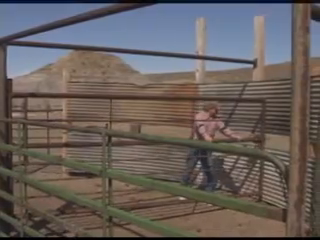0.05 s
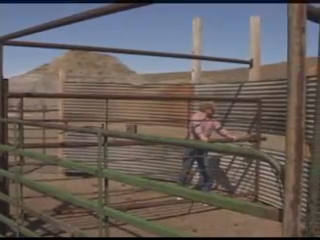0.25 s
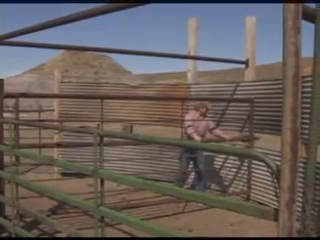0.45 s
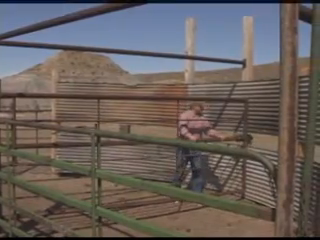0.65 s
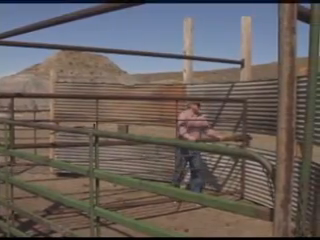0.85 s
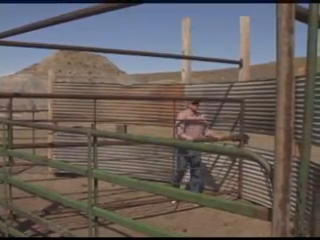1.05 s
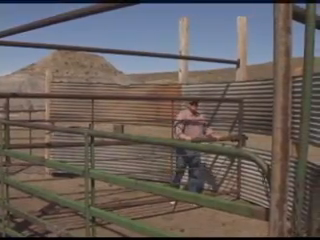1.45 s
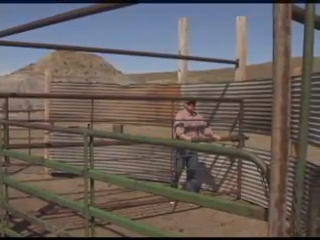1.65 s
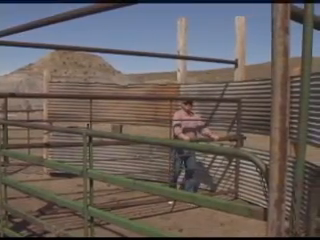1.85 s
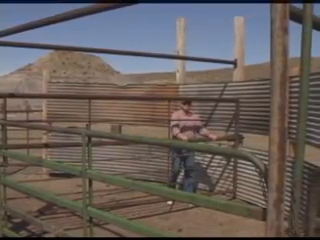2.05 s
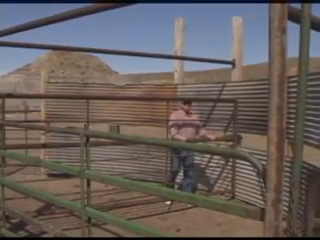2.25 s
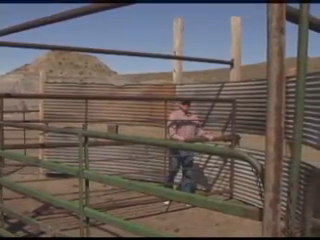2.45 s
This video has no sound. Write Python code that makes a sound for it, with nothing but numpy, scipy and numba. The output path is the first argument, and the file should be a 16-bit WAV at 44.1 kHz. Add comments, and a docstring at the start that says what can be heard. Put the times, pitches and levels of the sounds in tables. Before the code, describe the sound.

Metal pipe gate bangs shut with a jangle, followed by three duller clanks and rattling.

```python
"""A steel pipe gate bangs in an open corral walled with corrugated sheet, in light wind.
One bright jangling crash, flattened by a limiter, sets the pipes ringing; three duller
knocks follow, clanking the latch post and shaking the sheet wall. Between them the gate
shudders and rattles on its fittings, and the sliding latch scrapes and squeaks."""
import sys
import numpy as np
from scipy import signal
from scipy.fft import rfft, irfft
from scipy.io import wavfile
from scipy.ndimage import uniform_filter1d
from numba import njit

SR = 44100
rng = np.random.default_rng(int(sys.argv[2]) if len(sys.argv) > 2 else 0)


def int16_out(signal):
    """Quantize to a 16-bit WAV file."""
    q = np.round(np.clip(np.atleast_2d(signal).T, -1, 1) * 32767)
    wavfile.write(sys.argv[1], SR, q.astype(np.int16))


N = 114660

# EQ curves of the noise layers. Each row: frequency in Hz, relative level in dB.
WIND_EQ = [(15, -14.5), (30, 2), (60, 0), (110, -6.5), (200, -13), (400, -26), (1000, -45.5)]
AIR_EQ = [(100, -15.5), (300, -0.5), (550, -2), (900, 1), (1500, -7), (2600, -12), (4800, -20.5),
          (7500, -58), (9000, -74)]
CRASH_EQ = [(160, -44), (300, -23.5), (480, -5), (750, -3.5), (1150, -1.5), (2100, -4), (3000, -4.5),
            (4400, -3), (6000, -11.5), (7900, -6.5), (9000, -32.5)]
CLATTER_EQ = [(150, -12), (350, -17), (600, 8.5), (900, 12.5), (1500, 6.5), (2600, 3), (6000, -26.5),
              (9000, -77)]
CRACK_EQ = [(200, -35), (600, -31), (1200, -6.5), (3200, 3), (5000, 0), (7600, -2.5), (9200, -45)]
DULL_STEEL_EQ = [(120, -7.5), (250, -8), (500, -1), (850, 5.5), (1250, 1.5), (1800, -3.5), (3000, -11),
                 (9000, -32)]
BRIGHT_STEEL_EQ = [(1000, 1), (2200, -2), (3200, -4.5), (4300, 4.5), (5600, -6.5), (7800, -12.5),
                   (8800, -21.5)]
RATTLE_EQ = [(300, 2), (850, -4.5), (1150, 7.5), (1500, -3), (1850, 2.5), (2200, 5), (2700, -12),
             (5500, -10), (9000, -36)]
# Stereo width. Each row: frequency in Hz, side minus mid in dB.
WIDTH = [(60, -16.5), (300, -31), (600, -68), (1200, -22.5), (2500, -5.5), (4500, -2), (8000, 5)]

# Resonances of frame, pipes, damped latch post and sheet wall.
# Each row: pitch in Hz, relative level in dB, seconds to fall 60 dB (t60).
FRAME_MODES = [(408, -1, 0.22), (458, -1.5, 0.25), (840, -8, 0.17)]
PIPE_MODES = [(410, -38, 1.7), (450, -36, 1.7), (593, -29.5, 2.0), (715, -28, 2.0), (736, -29, 1.2),
              (994, -29, 1.6), (1107, -20, .8), (1280, -27, 1.2), (1463, -24, 1.0), (1907, -26, .8),
              (1945, -25, .85), (2029, -25, .7), (2654, -28, .7), (4210, -31, .7), (5880, -28, .45),
              (7214, -29, .45), (7790, -31, .45)]
POST_MODES = [(546.4, -14, 0.071), (820, -9.5, 0.073), (909, -7.5, 0.086), (1127, -10, 0.043),
              (1340, -25.5, .025), (1530, -21.5, 0.075), (2920, -23.5, 0.0047)]
WALL_MODES = [(74, -9, 3.6), (101.4, -0.5, 0.74), (128.8, -4, 1.02)]
# Tones of the fittings. Each row: pitch in Hz, relative level in dB.
FITTING_MODES = [(803, -10), (1085, -10.5), (1776.5, -6.5), (1958, -21.5), (2180, -12)]
# Tail of the crash. Each row: band centre in Hz, t60 in seconds.
CRASH_TAILS = [(300, 1.64), (800, 1.13), (1400, 0.95), (2400, 0.78), (4500, 0.52), (8000, 0.17)]

# Puffs of wind. Each row: peak time in seconds, half length in seconds, boost in dB.
GUSTS = [(0.628, 0.042, 3.5), (2.036, 0.041, 8)]
# Latch scrapes. Each row: start in seconds, hold in seconds, level in dB.
SCRAPES = [(0., .03, -33.5), (0.038, 0.07, -41), (0.873, 0.076, -33.5), (1.072, 0.1, -37.5),
           (1.408, 0.022, -43), (1.607, 0.042, -39.5), (1.77, 0.031, -41.5), (2.45, 0.099, -41)]
# Latch squeaks. Each row: start in seconds, hold in seconds, pitch in Hz, level in dB.
SQUEAKS = [(0.725, 0.087, 4150, -34), (0.89, .095, 4090, -36.5), (1.77, .012, 3750, -35)]
# Gate hits, the first layered with the crash. Each row: start in seconds, levels in dB of clank, crack,
# dull wash, bright wash and wall boom, clank tilt in dB per octave, clank pitch ratio.
BLOWS = [(0.2305, -1, -11.5, -37, -25, -56.5, -2, 1.46), (0.7085, -4.5, -13.5, -21, -25.5, -28, 11, 1.0),
         (1.1508, -7, -30, -30, -34, -36, -11, .96), (2.0722, -0.5, -20.5, -23, -31.5, -27, 2.5, 1.0)]
# Contacts within one hit. Each row: delay in seconds, relative level in dB.
BOUNCES = [(0, -1), (.0036, -10.5), (.0088, -12.5)]
# Swings of the shuddering gate. Each row: start in seconds, level in dB.
RATTLES = [(1.021, -29), (1.095, -29.5), (1.205, -30), (1.277, -30.5), (1.39, -33), (1.435, -43),
           (1.524, -32.5), (1.616, -31.5), (1.688, -38.5), (1.786, -34), (1.864, -40.5), (1.947, -41),
           (2.311, -37), (2.528, -32.5)]

WIND_DB, AIR_DB, HUM_DB, CRASH_DB, PIPE_DB = -36.5, -37, -30, -7.5, 2.5
CRASH_START_S, CRASH_RISE_S, JANGLE_HOLD_S = 0.225, 0.018, 0.011
CLANK_LOW_CUT_HZ, TILT_PIVOT_HZ = 380, 900
BEND_DELAY_S = 0.00078  # travel time of a 1 kHz bending wave along the pipe
LIMIT_DB, LIMIT_ATTACK_S, LIMIT_RELEASE_S = -5, 0.0017, 0.029
CLIP_LEVEL, HIGH_CUT_HZ = 1.15, 8650


def undb(db):
    """Decibels to gain."""
    return 10 ** (np.asarray(db) / 20)


def pan(db):
    """Channel gains for a left-minus-right level."""
    return undb(np.array([[db], [-db]]) / 2)


def lookup(table, hz):
    """Read (Hz, value) points on a log-frequency axis."""
    freqs, values = np.array(table, float).T
    return np.interp(np.log(np.maximum(hz, 1)), np.log(freqs), values)


def since(start):
    """Seconds since the start, zero before it."""
    return np.maximum(np.arange(N) / SR - start, 0)


def envelope(start, rise, hold, t60):
    """Linear attack, hold, exponential release, all in seconds."""
    attack = np.minimum(since(start) / max(rise, 1 / SR), 1)
    return attack * np.exp(-np.log(1000) * since(start + rise + hold) / t60)


def widen(mid, side, hz):
    """Stereo image: tight in the bass, wide in the treble."""
    width = undb(lookup(WIDTH, hz))
    return (mid + np.array([[1], [-1]]) * width * side) / np.sqrt(1 + width ** 2)


def noise(eq, spacing_hz=0, side_db=0):
    """EQ'd stereo noise, rms 1; with a mean spacing, a crowd of irregular partials instead."""
    hz = np.fft.rfftfreq(N, 1 / SR)
    mid, side = rfft(rng.standard_normal((2, N)))
    gain = undb(lookup(eq, hz))
    if spacing_hz:
        gain = gain * (rng.random(len(hz)) < hz[1] / spacing_hz)
        mid, side = mid / abs(mid), side / abs(side)
    y = irfft(widen(mid, undb(side_db) * side, hz) * gain, N)
    return y / y.std()


def drift(rate_hz):
    """Smooth random modulation, spread 1."""
    span = int(SR / rate_hz)
    y = uniform_filter1d(rng.standard_normal(N), span, mode="wrap")
    y = uniform_filter1d(y, span, mode="wrap")
    return y / y.std()


def tone(hz, waver=0):
    """One stereo partial, rms 1, with an optional relative pitch waver."""
    phase = 2 * np.pi * np.cumsum(hz * (np.ones(N) + waver)) / SR + rng.uniform(0, 2 * np.pi)
    return np.sqrt(2) * widen(np.sin(phase), rng.choice([-1, 1]) * np.cos(phase), hz)


def ring(modes, start, rise):
    """Struck modes that swell and die away."""
    return sum(undb(db) * tone(hz) * envelope(start, rise, 0, t60) for hz, db, t60 in modes)


def wind_and_air():
    """The bed: low wind on the microphone, with two puffs, over the steady air of the yard."""
    puffs_db = sum(db * np.exp(-((since(0) - peak) / half) ** 2) for peak, half, db in GUSTS)
    wind = noise(WIND_EQ, side_db=2) * undb(WIND_DB + puffs_db + 1.5 * drift(7))
    air = noise(AIR_EQ) * undb(AIR_DB + 2.4 * drift(17))
    return wind + pan(-2) * air


def frame_hum():
    """The frame is already ringing faintly at the start and soon dies away."""
    return undb(HUM_DB) * ring(FRAME_MODES, start=0, rise=0.0013)


def latch():
    """The latch slides with a gritty scrape and now and then squeaks."""
    slides = sum(undb(db) * envelope(start, 0.0033, hold, t60=0.12) for start, hold, db in SCRAPES)
    scrapes = slides * noise(BRIGHT_STEEL_EQ) * undb(3.2 * drift(210))
    squeaks = sum(undb(db) * tone(hz, waver=0.014 * drift(340)) * envelope(start, 0.0027, hold, t60=0.06)
                  for start, hold, hz, db in SQUEAKS)
    return scrapes + squeaks * undb(drift(80))


def crash():
    """Loose steel jangles against the gate: crowded modes fade, highs first, and the pipes ring on."""
    hz = np.fft.rfftfreq(N, 1 / SR)
    onset = CRASH_START_S, CRASH_RISE_S, JANGLE_HOLD_S
    steel_spectrum = rfft(noise(CRASH_EQ, spacing_hz=11))
    contact_grit = undb(-5) * noise(CRASH_EQ) * undb(2 * drift(190)) * envelope(*onset, t60=0.27)
    jangle = 0
    for centre, t60 in CRASH_TAILS:
        band = lookup([(f, f == centre) for f, _ in CRASH_TAILS], hz)  # crossfades into its neighbours
        jangle += irfft(steel_spectrum * band, N) * envelope(*onset, t60)
    pipes = ring(PIPE_MODES, CRASH_START_S, rise=0.02)
    return undb(CRASH_DB) * (contact_grit + jangle) + undb(PIPE_DB) * pipes


def clank(start, tilt_db, pitch):
    """A few quick contacts ring the latch post; bending waves bring the treble ahead of the bass."""
    t = np.arange(SR // 5) / SR
    post = 0
    for hz, db, t60 in POST_MODES:
        gain = undb(db + tilt_db * np.log2(hz / TILT_PIVOT_HZ))
        post += gain * np.sin(2 * np.pi * hz * pitch * t) * np.exp(-np.log(1000) * t / t60)
    contacts = np.zeros(N)
    for delay, db in BOUNCES:
        i = int((start + delay) * SR)
        contacts[i:i + len(t)] += undb(db) * post
    # The clank carries hardly any low end.
    contacts = signal.sosfilt(signal.butter(2, CLANK_LOW_CUT_HZ, "high", fs=SR, output="sos"), contacts)
    lag_cycles = 2 * BEND_DELAY_S * np.sqrt(1000 * np.fft.rfftfreq(N, 1 / SR))
    return irfft(rfft(contacts) * np.exp(-2j * np.pi * lag_cycles), N)


def blows():
    """Each hit clanks and cracks, then washes through the pipes and booms in the corrugated wall."""
    out = 0
    for start, clank_db, crack_db, dull_db, bright_db, boom_db, tilt_db, pitch in BLOWS:
        clatter = undb(-11) * noise(CLATTER_EQ) * envelope(start, 0.0013, 0, t60=0.25)
        out += undb(clank_db) * (clank(start, tilt_db, pitch) + clatter)
        out += undb(crack_db) * noise(CRACK_EQ) * envelope(start, 0.0002, 0, t60=0.12)
        dull = noise(DULL_STEEL_EQ, spacing_hz=9) * envelope(start, 0.004, 0, t60=2.04)
        bright = noise(BRIGHT_STEEL_EQ, spacing_hz=14) * envelope(start, 0.0017, 0, t60=1.78)
        wash = undb(dull_db) * dull + undb(bright_db) * bright
        out += wash * undb(0.84 * drift(86))
        out += undb(boom_db) * ring(WALL_MODES, start, rise=0.017)
    return out


def rattles():
    """The gate shudders about twelve times a second, chafing on its fittings at each swing."""
    swings = sum(undb(db) * envelope(start, 0.0098, hold=0.016, t60=0.28) for start, db in RATTLES)
    fittings = sum(undb(db) * tone(hz, waver=0.0033 * drift(71)) for hz, db in FITTING_MODES)
    grit = undb(-3.5) * noise(RATTLE_EQ)
    return swings * (fittings + grit)


def scene():
    """The mix: gate near the centre, fittings and latch to the right, wind underneath."""
    gate = pan(-1) * crash() + blows() + frame_hum()
    return gate + pan(-9) * rattles() + pan(-3.5) * latch() + wind_and_air()


@njit
def follow(x, attack, release):
    """Level follower with separate rates up and down."""
    out, level = np.empty(len(x)), 0.
    for i in range(len(x)):
        level += (x[i] - level) * (attack if x[i] > level else release)
        out[i] = level
    return out


def record(dry):
    """A limiter holds down the crash, a soft clip rounds the peaks and a steep filter cuts the top."""
    level = follow(abs(dry).max(axis=0), 1 / (LIMIT_ATTACK_S * SR), 1 / (LIMIT_RELEASE_S * SR))
    limited = dry / np.maximum(level / undb(LIMIT_DB), 1)
    rounded = CLIP_LEVEL * np.tanh(limited / CLIP_LEVEL)
    return signal.sosfilt(signal.ellip(8, .2, 70, HIGH_CUT_HZ, fs=SR, output="sos"), rounded)


dry = scene()
out = record(dry)
int16_out(out)
```